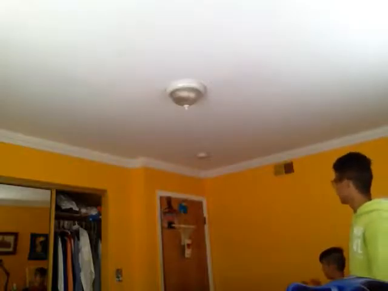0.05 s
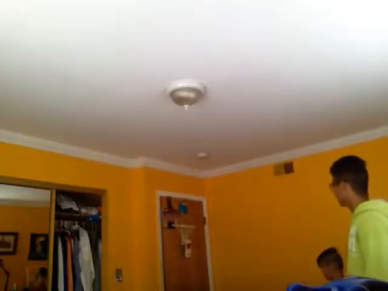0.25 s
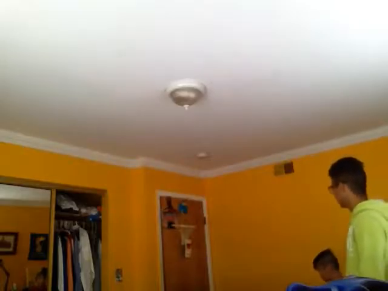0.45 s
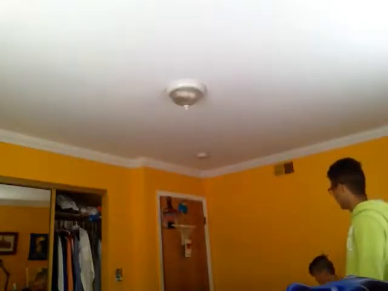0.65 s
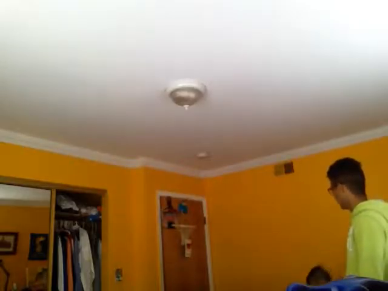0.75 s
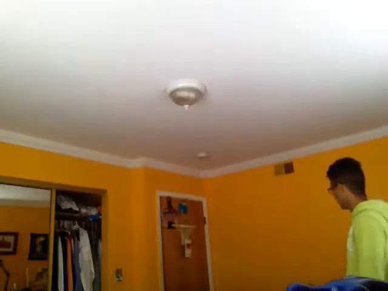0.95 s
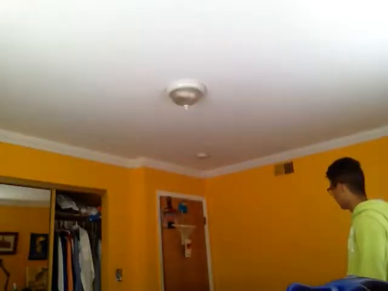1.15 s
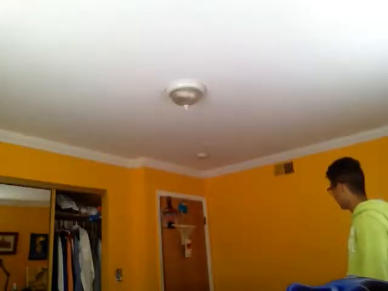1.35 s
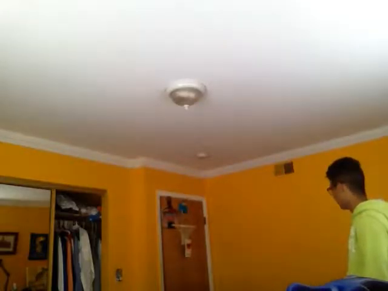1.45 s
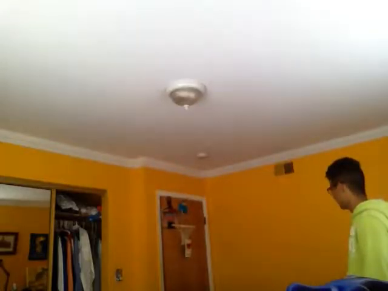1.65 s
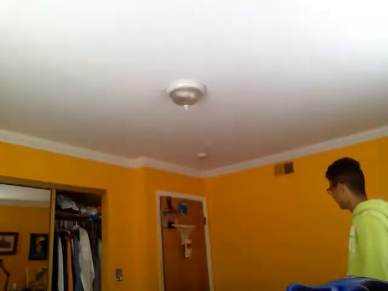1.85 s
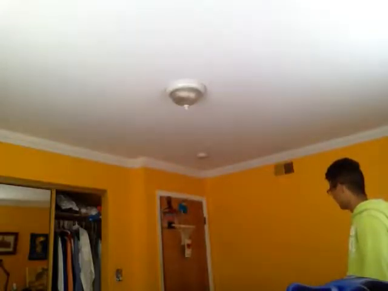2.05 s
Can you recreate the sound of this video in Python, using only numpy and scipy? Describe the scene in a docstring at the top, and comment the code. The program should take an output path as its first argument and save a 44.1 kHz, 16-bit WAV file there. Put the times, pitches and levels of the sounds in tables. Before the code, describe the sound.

A small rubber basketball bounces five times on a wooden bedroom floor, the first bounce loudest

```python
"""First a low murmur of room air under hiss and the end of a dull knock, then a small rubber ball bounces five times.
It lands on a wooden floor in a small furnished room, some metres from the microphone.
Each bounce starts as ringing of boards and room; a slap made of a click and two short notes follows, with echoes.
Knocks are filtered clicks with a wooden hum; brief rustles, faint ticks and a thin whistle are shaped noise."""
import sys
import numpy as np
from scipy import signal
from scipy.fft import rfft, irfft
from scipy.io import wavfile
from scipy.ndimage import uniform_filter1d

SR = 44100
rng = np.random.default_rng(int(sys.argv[2]) if len(sys.argv) > 2 else 0)


def volts_from_db(level):
    """Convert decibel levels to linear amplitude ratios."""
    exponent = np.asarray(level, float) / 20
    return 10 ** exponent


def unload_wav(signal):
    """Save mono or channel-first audio to the path in sys.argv[1] as 16-bit WAV at rate SR, clipped to [-1, 1]."""
    wavfile.write(
        sys.argv[1],
        SR,
        np.round(np.clip(np.atleast_2d(signal).T, -1, 1) * 32767).astype(np.int16),
    )


N = 92169  # length of the scene in samples


def read(points, hz):
    """Reads a curve of (f/Hz, value) points, with straight lines on a log-frequency axis."""
    f, value = np.transpose(points)
    return np.interp(np.log(hz + 1), np.log(f + 1), value)


def evened(x):
    """Scales a sound to rms 1."""
    return x / np.sqrt(np.mean(x ** 2) + 1e-20)


def add(mix, start_s, sound):
    """Mixes a sound in at a time that may lie before the start; whatever falls outside is cut off."""
    at = round(start_s * SR)
    sound = sound[max(-at, 0):]
    part = mix[max(at, 0):][:len(sound)]
    part += sound[:len(part)]


def seconds(length_s):
    """Time axis in seconds."""
    return np.arange(round(length_s * SR)) / SR


def swell(t, rise_s, t60_s):
    """Loudness curve that rises smoothly while it dies by 60 dB in every t60."""
    rising = (1 - np.exp(-t / max(rise_s, 1e-4))) ** 2
    return rising * volts_from_db(-60 * t / t60_s)


def click(points, tilt_db, size=4096):
    """A click of energy 1 with the given spectrum, tilted by tilt_db per octave above 2 kHz."""
    hz = abs(np.fft.fftfreq(size, 1 / SR))
    octaves = np.log2(np.maximum(hz / 2000, 1))
    level_db = np.maximum(read(points, hz), -100) + tilt_db * octaves
    log_gain = level_db * np.log(10) / 20
    # this choice of phase puts the energy as early as possible
    spectrum = np.exp(np.conj(signal.hilbert(log_gain)))
    pulse = np.fft.ifft(spectrum).real[:size // 2]
    return pulse / np.linalg.norm(pulse)


def noise(points, size):
    """Random noise of rms 1 with the given spectrum."""
    spectrum = rfft(rng.standard_normal(size))
    gain = volts_from_db(read(points, np.fft.rfftfreq(size, 1 / SR)))
    return evened(irfft(spectrum * gain, size))


def ring(modes, t):
    """Sum of dying sine notes, one per way the struck thing can vibrate."""
    return sum(volts_from_db(db) * swell(t, rise_s, t60_s) * np.sin(2 * np.pi * hz * t)
               for hz, db, t60_s, rise_s in modes)


# how long the room rings at each pitch: (f/Hz, t60/s)
ROOM_DECAY = [(100, 1), (300, 0.27), (700, .33), (1500, 0.36), (3000, 0.27), (6000, 0.3), (10000, 0.29),
              (13000, 0.11), (15500, 0.053)]
TAIL_RISE_S = 0.0041


def reverb(t):
    """A fresh diffuse tail of energy 1: noise in which each band dies at its own speed."""
    hz, frame_s, bands = signal.stft(rng.standard_normal(len(t)), SR, nperseg=256)
    fade = volts_from_db(-60 * frame_s / read(ROOM_DECAY, hz)[:, None])
    tail = signal.istft(bands * fade, SR, nperseg=256)[1][:len(t)]
    tail = tail * (1 - np.exp(-t / TAIL_RISE_S))
    return tail / np.linalg.norm(tail)


# spectrum of the ball's slap, also used for its tail: (f/Hz, relative level/dB)
SLAP_SPECTRUM = [(88, -40.5), (150, -7.5), (302, 0), (373, -7.5), (490, -6.5), (827, -11.5), (1200, -14),
                 (1910, -15), (3000, -19.5), (4000, -23.5), (7000, -28.5), (10000, -36), (13500, -37.5),
                 (15600, -50)]
# early echoes: (delay t/s, signed gain)
EARLY_ECHOES = [(.0009, 0.8), (.0041, 0.93), (.0058, 1), (.0085, -0.54), (0.0105, .4), (0.016, 1)]
EDGE_DB, EDGE_TILT_DB = -4, -2  # click at the edge of the slap; the tilt is per octave above 2 kHz
OVERTONE, OVERTONE_DB = 1.57, -7  # pitch as a multiple of the slap pitch; level against the main note
SLAP_RISE_SHARE = 0.069  # rise of the main note as a share of its t60


def slap(t, slap_hz, cycles, tilt_db):
    """The ball's skin sounds as a click and two short notes, arriving several times by way of the room."""
    paths = np.zeros(len(t))
    for delay_s, gain in [(0.0017, 1)] + EARLY_ECHOES:
        paths[round(delay_s * SR)] += gain
    edge = click(SLAP_SPECTRUM, tilt_db + EDGE_TILT_DB)
    t60_s = cycles / slap_hz
    skin = [(slap_hz, 0, t60_s, SLAP_RISE_SHARE * t60_s),
            (OVERTONE * slap_hz, OVERTONE_DB, t60_s / 2, 1e-4)]
    blow = volts_from_db(EDGE_DB) * 2 * edge + ring(skin, t[:len(edge)])
    return signal.fftconvolve(blow, paths)


# drum note of the boards under the ball: (f/Hz, relative level/dB, t60/s, rise/s)
DRUM_NOTE = [(311.3, 1.5, 0.23, 0.014), (408.4, -17.5, 0.33, 0.0052), (467.5, -5.5, 0.17, 0.012),
             (507.6, -10, 0.27, 0.0055)]
# higher notes of the boards, same columns: (f/Hz, relative level/dB, t60/s, rise/s)
BOARD_NOTES = [(476, 4.5, 0.025, 0.0018), (1150, -18, 0.045, 0.00011), (1740, -16.5, 0.02, 0.00032),
               (2920, -18, 0.033, 0.0009)]
# lowest notes of the room: (f/Hz, relative level/dB, t60/s, rise/s)
DEEP_BOOM = [(78.3, -12.5, 0.51, 0.0027), (91.1, 2.5, 0.22, 0.0039), (101.3, -5, 0.36, 0.017)]
# next notes of the room: (f/Hz, relative level/dB, t60/s, rise/s)
UPPER_BOOM = [(119.6, 5.5, 0.19, 0.017), (135.45, -10, 0.55, 0.035), (152.3, 5, 0.16, 0.045),
              (167.4, -2.5, 0.31, 0.0059), (209.3, -7.5, 0.22, 0.0074)]
# knocking notes of a landing: (f/Hz, relative level/dB, t60/s, rise/s)
KNOCK_NOTE = [(575, -6.5, 0.3, 0.0067), (633.3, -6.5, 0.34, 0.0041), (739.5, 0, .16, 0.0051),
              (1138, -6.5, .15, 0.0039)]


def floor_and_room(t, deep_db, upper_db, drum_db, note_db):
    """The landing sets boards and room ringing, each group of notes at its own level."""
    boom = volts_from_db(deep_db) * ring(DEEP_BOOM, t) + volts_from_db(upper_db) * ring(UPPER_BOOM, t)
    boards = volts_from_db(drum_db) * ring(DRUM_NOTE + BOARD_NOTES, t)
    return boom + boards + volts_from_db(note_db) * ring(KNOCK_NOTE, t)


# the bounces: (t/s, slap level/dB, slap pitch f/Hz, slap t60 in cycles,
# treble tilt of the tail in dB per octave above 2 kHz, to which the click adds its own)
BOUNCES = [(0.4091, -5, 1590, 3.8, 1.2), (.9165, -15, 1350, 8.1, 2.9), (1.2398, -17, 1150, 6, 2.7),
           (1.5628, -10, 2130, 3.9, 0.3), (1.8874, -18.5, 1484, 5.3, 1.6)]
# how the room answers at each landing spot: (tail level/dB, deep boom level/dB, upper boom level/dB,
# drum note level/dB, knock note level/dB)
LANDING_SPOTS = [(1.5, -16.5, -17, -11.5, -26.5), (-6, -25, -32, -16, -28), (-8, -23.5, -19, -19, -27.5),
                 (-5, -19.5, -16, -24, -30), (-13, -23.5, -20, -23, -29)]
BOARDS_LEAD_S = 0.00415


def bounce(mix, start_s, slap_db, slap_hz, cycles, tilt_db, tail_db, deep_db, upper_db, drum_db, note_db):
    """Ringing through the boards sets in first, then the slap travels by air and leaves a diffuse tail."""
    t = seconds(0.67)
    tail = signal.fftconvolve(click(SLAP_SPECTRUM, tilt_db), reverb(t))
    direct = volts_from_db(slap_db) * slap(t, slap_hz, cycles, tilt_db)
    add(mix, start_s, direct + 2 * volts_from_db(tail_db) * tail)
    add(mix, start_s - BOARDS_LEAD_S, floor_and_room(t, deep_db, upper_db, drum_db, note_db))


# dull knocks: (t/s, relative thud level/dB, hum level/dB, hum rise/s, hum t60/s)
KNOCKS = [(-.06, -43, -28, 0.0082, 0.22), (0.099, -47.5, -38, .03, 0.22), (0.199, -49, -53, 0.04, .2),
          (0.311, -53, -53, 0.034, 0.12), (1.0109, -30, -20, 0.0011, .22), (1.051, -41, -30, .012, 0.1),
          (1.113, -51, -28.5, 0.0066, 0.11), (1.455, -36.5, -28.5, 0.0022, 0.27),
          (1.735, -37.5, -34, 0.0025, 0.17), (1.751, -47.5, -4, 0.03, 0.1)]
# spectrum of the thud: (f/Hz, relative level/dB)
THUD_SPECTRUM = [(60, -66), (120, -38), (210, -3), (400, 3), (700, -5), (1200, -16.5), (2000, -23),
                 (5000, -35), (15500, -41)]
# what the knocks ring with: (f/Hz, relative level/dB, share of the hum t60, extra rise/s)
WOOD_HUM = [(167.5, -15, 2.1, 0.004), (216.3, 0.7, 1.1, 0.0099), (283.3, 1.5, 0.41, .003),
            (387.5, 3.2, 0.31, 0.00051), (569, -8, 0.44, 0.00081), (668, -10.5, 0.69, 0.0013),
            (1002, -15, 0.45, .001)]
KNOCK_DIRECT_DB = -10  # direct sound, against a tail of energy 1
DULL_DB_PER_OCT_S = 250  # loss per octave away from the second hum note, per second of rise


def knock(mix, start_s, thud_db, hum_db, rise_s, t60_s):
    """A soft blow heard through the room, with a wooden hum; slower blows ring the far notes less."""
    t = seconds(.6)
    paths = reverb(t)
    paths[0] = volts_from_db(KNOCK_DIRECT_DB)
    thud = signal.fftconvolve(click(THUD_SPECTRUM, 0), paths)[:len(t)]
    modes = []
    for hz, level_db, share, extra_s in WOOD_HUM:
        octaves = abs(np.log2(hz / WOOD_HUM[1][0]))
        level_db = level_db - rise_s * DULL_DB_PER_OCT_S * octaves
        modes.append((hz, level_db, share * t60_s, rise_s + extra_s))
    add(mix, start_s, volts_from_db(thud_db) * 20 * thud + volts_from_db(hum_db) * ring(modes, t))


# start of each rustle: (t/s)
RUSTLE_TIMES = [.315, 1.015, 1.17, 1.735]
# shape of each rustle: (rise/s, t60/s, level/dB before the swell)
RUSTLES = [(0.029, 0.35, -45), (0.023, 0.73, -46.5), (0.031, 0.9, -52.5), (0.013, 0.37, -39)]
# spectrum of a rustle: (f/Hz, relative level/dB)
RUSTLE_SPECTRUM = [(400, -1), (1500, 4.5), (3000, -1), (6000, -9), (11000, -9.5), (15000, -17.5)]


def rustle(mix, start_s, rise_s, t60_s, db):
    """A puff of wide noise, made slightly grainy by small random changes of loudness."""
    t = seconds(.5)
    wobble_db = 1.2 * evened(uniform_filter1d(rng.standard_normal(len(t)), 150))
    puff = swell(t, rise_s, t60_s) * volts_from_db(wobble_db) * noise(RUSTLE_SPECTRUM, len(t))
    add(mix, start_s, volts_from_db(db) * puff)


# faint ticks: (t/s, level/dB before the swell, f/Hz)
TICKS = [(1.018, -44, 10100), (1.12, -49.5, 6960), (1.178, -46.5, 4360), (1.198, -43, 9000),
         (1.215, -45.5, 7660)]
TICK_T60_S, TICK_WIDTH = .03, .2  # the width is a share of the pitch


def tick(mix, start_s, db, hz):
    """A tiny bright tick: a band of noise around one pitch that dies at once."""
    t = seconds(.06)
    band = [(hz * (1 - 2 * TICK_WIDTH), -40), (hz * (1 - TICK_WIDTH / 2), 0),
            (hz * (1 + TICK_WIDTH), 0), (hz * (1 + 2 * TICK_WIDTH), -40)]
    add(mix, start_s, volts_from_db(db) * swell(t, 0.0015, TICK_T60_S) * noise(band, len(t)))


# whistles: (t/s, length/s, level/dB at the height of the swell)
WHISTLES = [(.08, .14, -63), (.3, .115, -59), (1.31, .16, -57)]
WHISTLE_HZ, WHISTLE_WIDTH_HZ = 1820, 60


def whistle(mix, start_s, length_s, db):
    """A thin fuzzy whistle: a narrow band of noise that swells and fades."""
    t, hz, width = seconds(length_s), WHISTLE_HZ, WHISTLE_WIDTH_HZ
    band = [(hz - 3 * width, -40), (hz - width / 2, 0), (hz + width / 2, 0), (hz + 3 * width, -40)]
    add(mix, start_s, volts_from_db(db) * np.sin(np.pi * t / length_s) * noise(band, len(t)))


# spectrum of the room air, from murmur to hiss: (f/Hz, relative level/dB)
AIR_SPECTRUM = [(30, -32), (60, -16), (110, -6), (170, -5), (270, 1), (410, -15.5), (600, -9.5), (850, -19),
                (1550, -19.5), (3000, -27.5), (15500, -31)]
AIR_DB = -52.5  # rms level before the microphone


def room_air():
    """Steady noise, strongest in the lows, heard as a low murmur under hiss."""
    return volts_from_db(AIR_DB) * noise(AIR_SPECTRUM, N)


def scene():
    """All sources over the room air."""
    mix = room_air()
    for hit, spot in zip(BOUNCES, LANDING_SPOTS):
        bounce(mix, *hit, *spot)
    for row in KNOCKS:
        knock(mix, *row)
    for start_s, row in zip(RUSTLE_TIMES, RUSTLES):
        rustle(mix, start_s, *row)
    for row in TICKS:
        tick(mix, *row)
    for row in WHISTLES:
        whistle(mix, *row)
    return mix[None]


def top_cut(x):
    """Nothing passes above the cut-off."""
    return signal.sosfilt(signal.butter(12, 15670, fs=SR, output="sos"), x)


LOW_CUT_HZ = 66


def record(dry):
    """The microphone cuts the deep bass."""
    low_cut = signal.butter(2, LOW_CUT_HZ, "high", fs=SR, output="sos")
    mix = signal.sosfilt(low_cut, dry)
    return top_cut(mix)


dry = scene()
out = record(dry)
unload_wav(out)
```